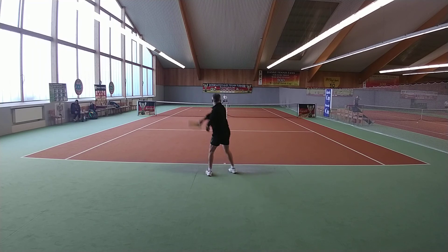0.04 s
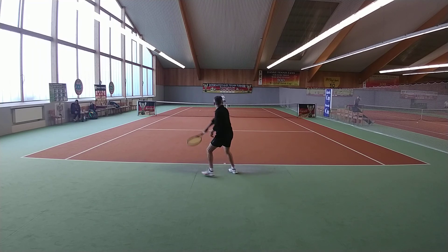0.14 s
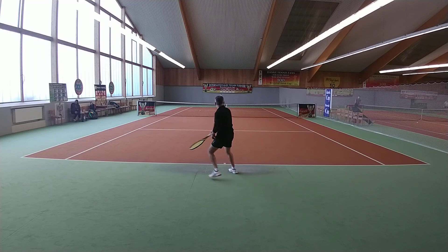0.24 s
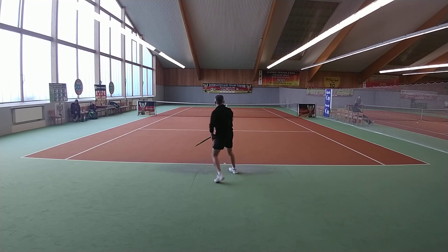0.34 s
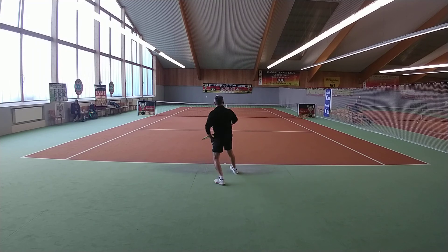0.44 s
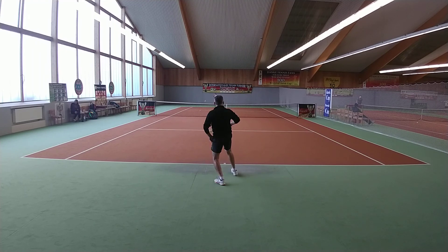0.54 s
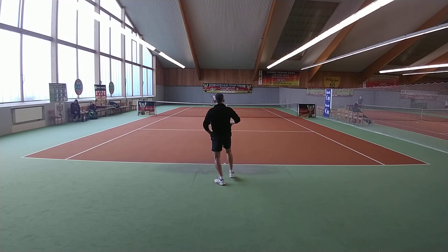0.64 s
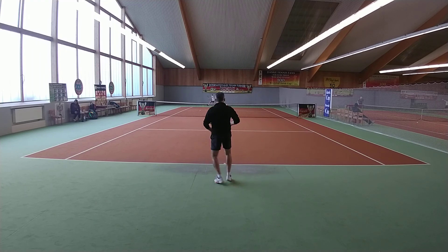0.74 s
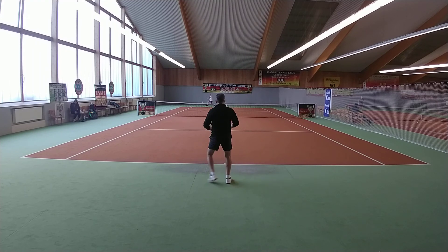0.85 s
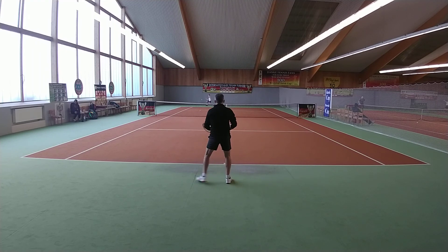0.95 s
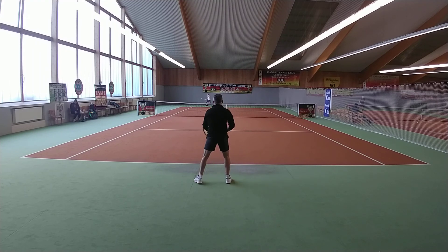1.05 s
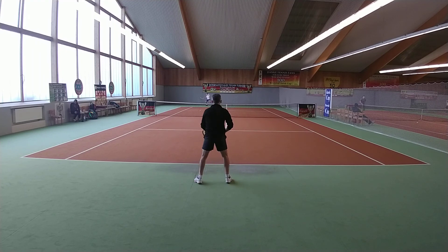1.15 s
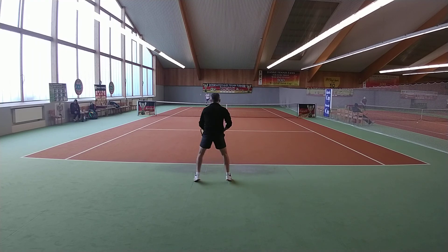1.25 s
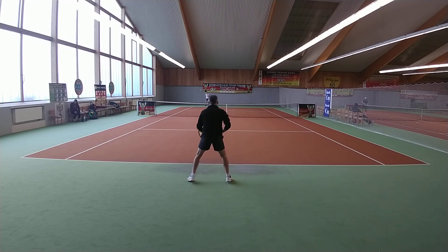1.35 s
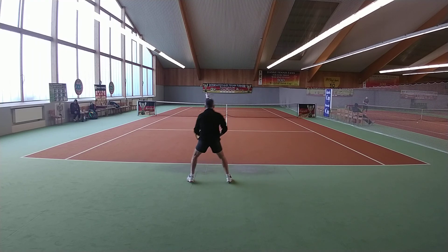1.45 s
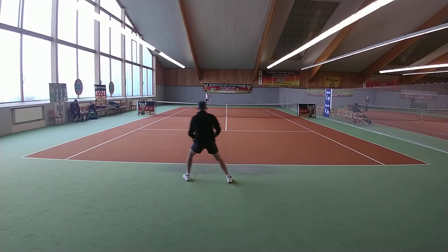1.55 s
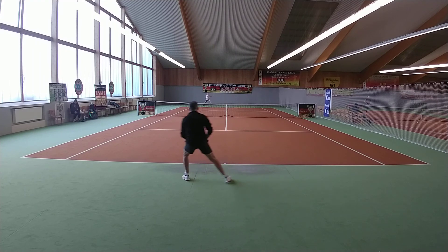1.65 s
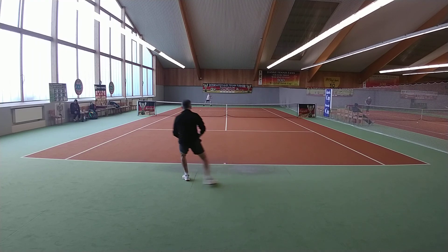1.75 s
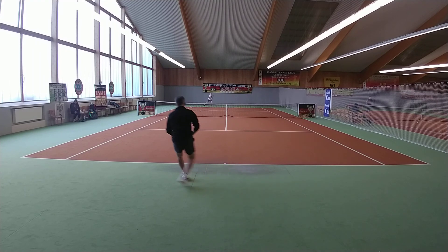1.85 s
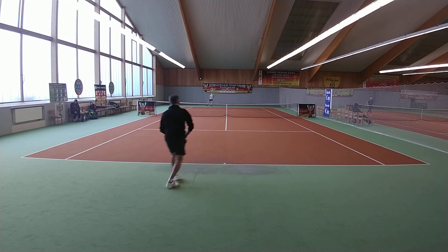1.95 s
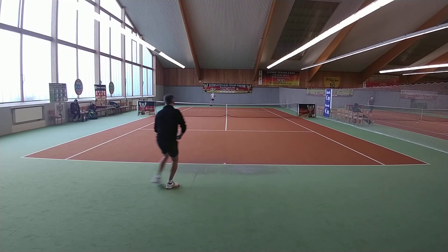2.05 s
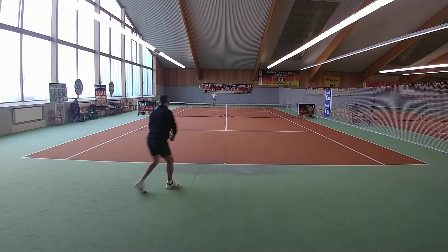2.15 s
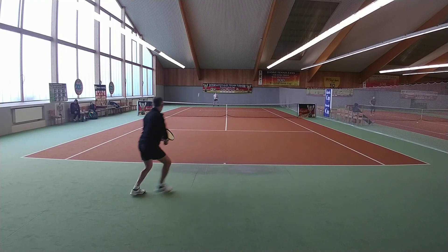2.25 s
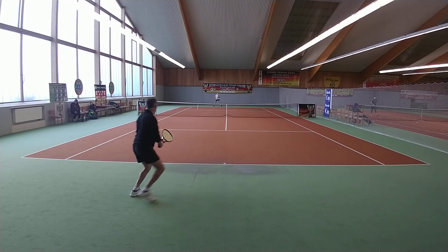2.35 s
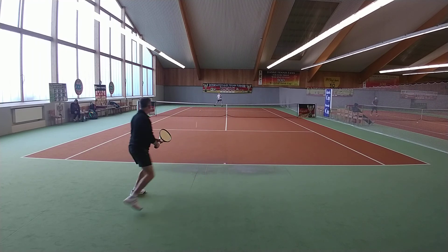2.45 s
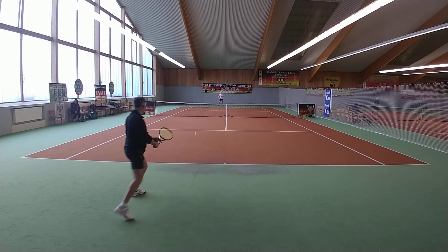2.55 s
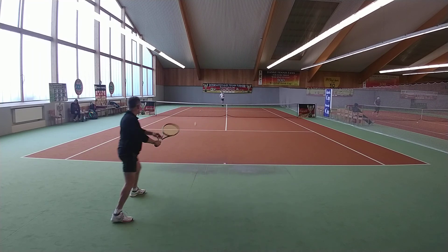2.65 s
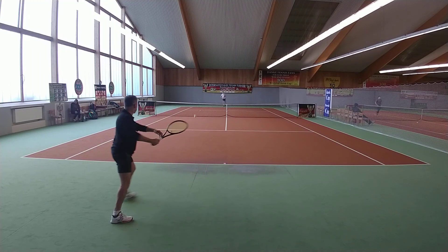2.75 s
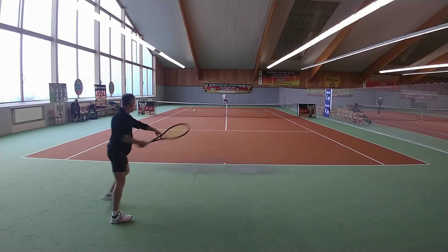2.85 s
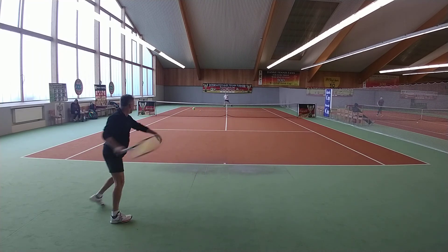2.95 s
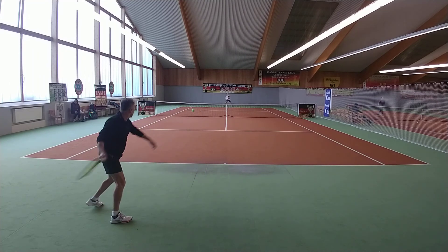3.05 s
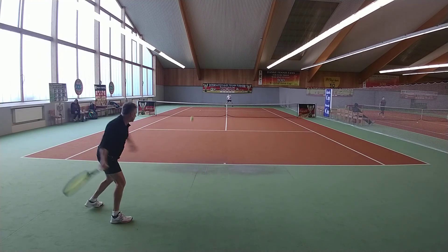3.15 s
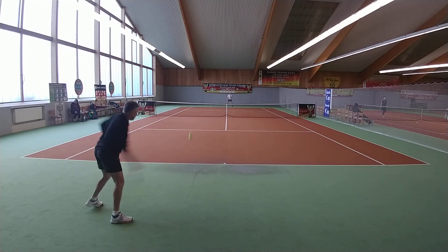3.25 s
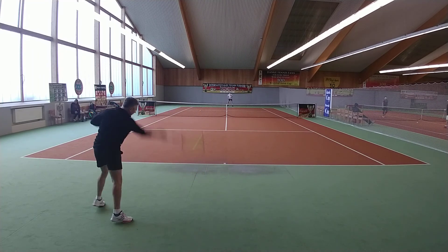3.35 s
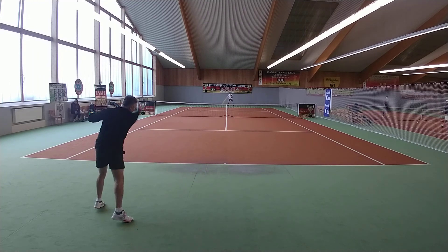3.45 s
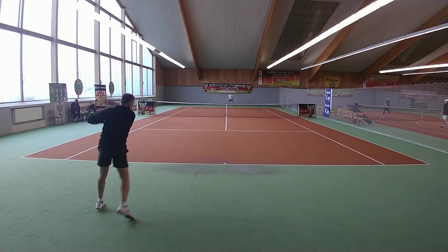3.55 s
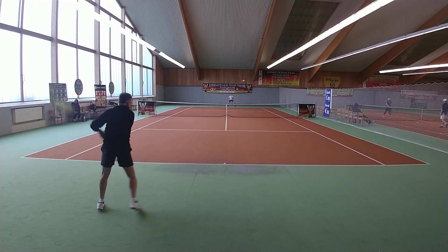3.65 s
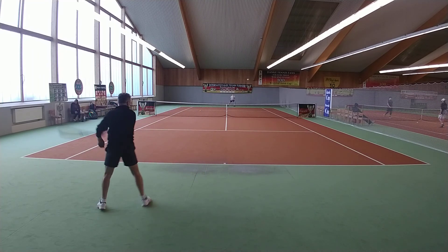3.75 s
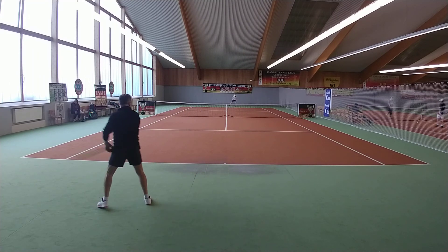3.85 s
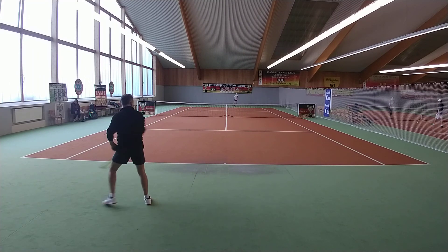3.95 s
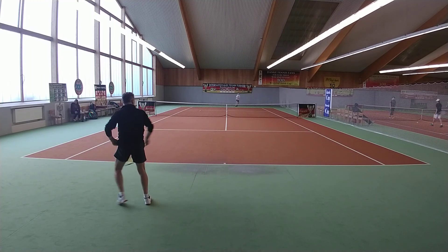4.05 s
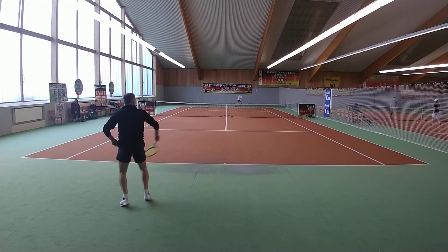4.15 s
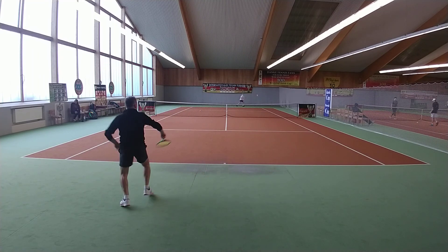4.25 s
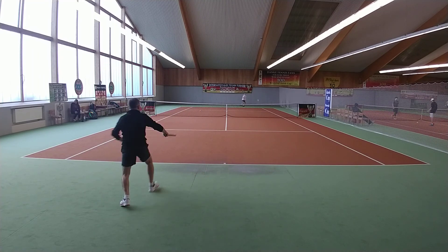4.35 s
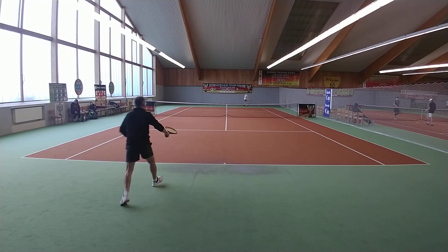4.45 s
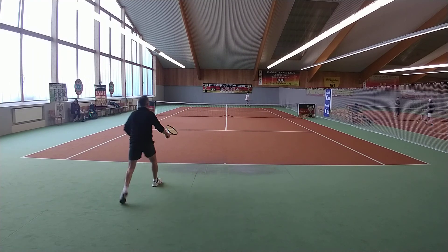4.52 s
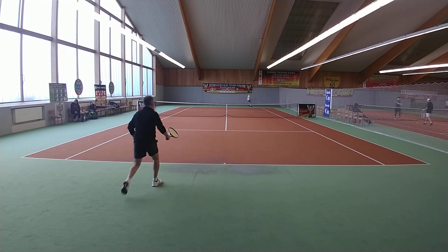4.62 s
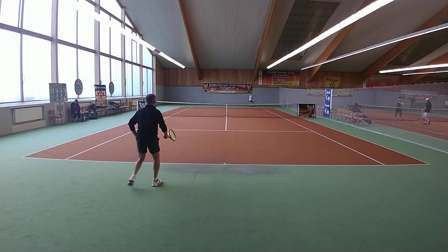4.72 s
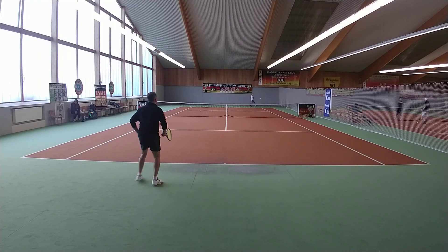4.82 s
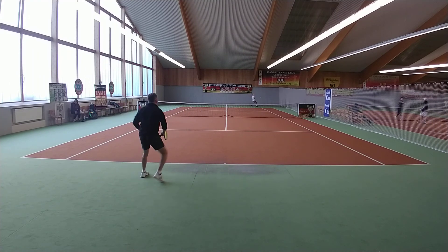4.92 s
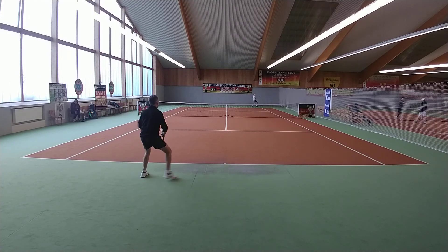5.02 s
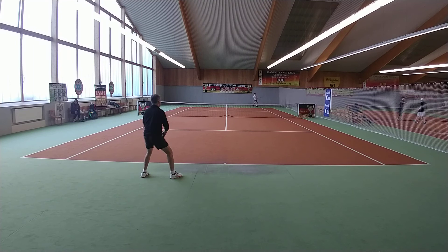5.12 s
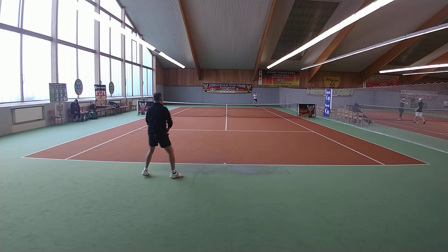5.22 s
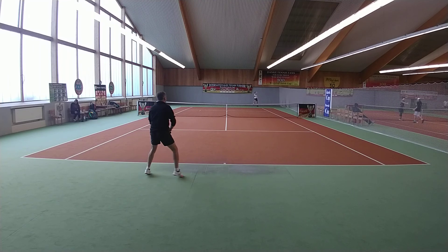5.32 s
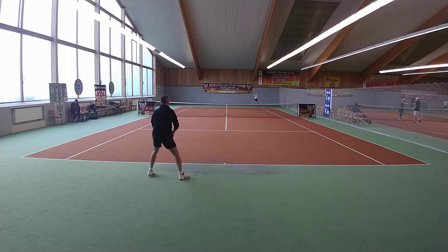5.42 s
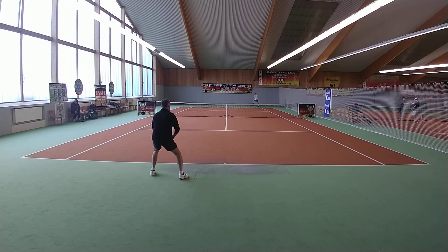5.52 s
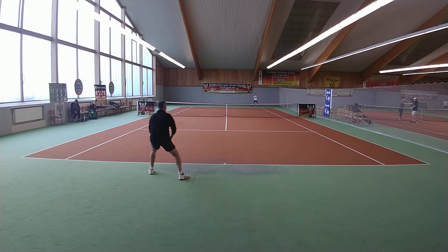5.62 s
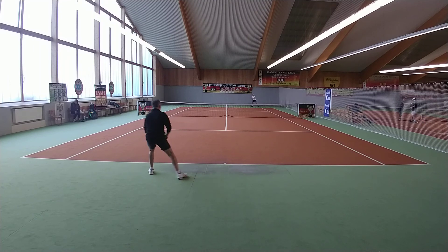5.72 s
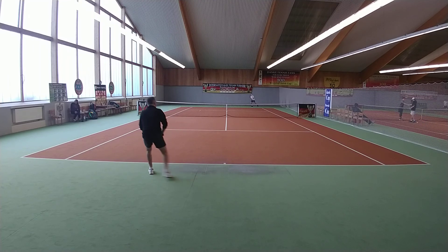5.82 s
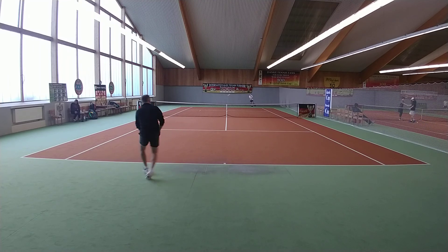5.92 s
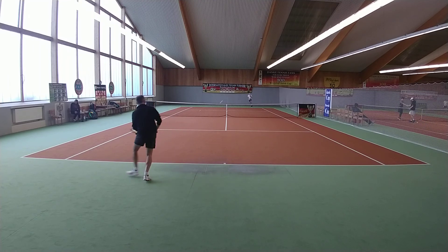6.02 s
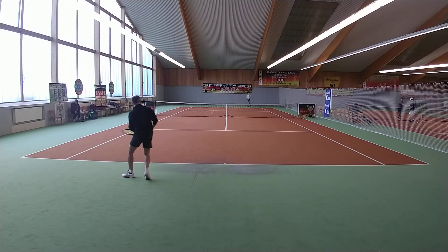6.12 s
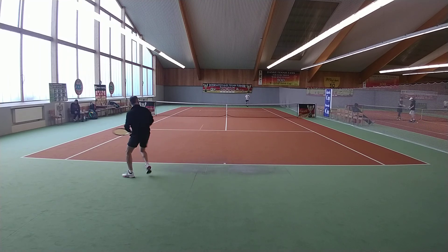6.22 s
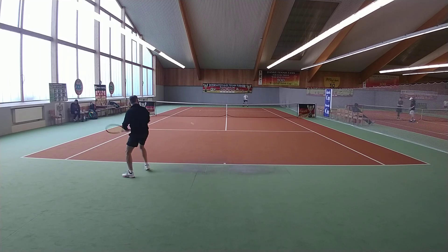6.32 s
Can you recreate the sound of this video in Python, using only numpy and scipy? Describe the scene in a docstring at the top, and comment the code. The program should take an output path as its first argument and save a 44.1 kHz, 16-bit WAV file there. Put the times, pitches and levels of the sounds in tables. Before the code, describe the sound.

Heard from behind the baseline of a reverberant indoor tennis court, shoes thump and swish on carpet over a faint hum. After the fading ring of a stroke come a few soft, distant hits, a hollow ball bounce and one sharp, close racket strike, the loudest sound, which fills the hall. The footwork continues through a faint bounce, a soft far stroke and a final bounce.

```python
"""A rally on a carpeted court in a large indoor hall, heard from behind the near baseline.
The tail of a racket stroke dies into the hum of the hall, and shoes start to thud and brush. Softer
strokes ring near 1.5 s, the ball bounces at 2.6 s, and the loudest stroke cracks at 3.4 s, thrown back
by the end walls. A faint bounce, a soft stroke and a last bounce follow. Throughout, reflections fill
the hall, and a noise gate turns quiet passages down and opens for anything louder."""
import sys
import numpy as np
from scipy import signal
from scipy.fft import rfft, irfft, next_fast_len
from scipy.io import wavfile
from scipy.ndimage import minimum_filter1d

SR = 44100
rng = np.random.default_rng(int(sys.argv[2]) if len(sys.argv) > 2 else 0)


def dump(signal):
    """Clip the signal to [-1, 1] and save it as 16-bit WAV at the path in sys.argv[1]."""
    limited = np.clip(np.atleast_2d(signal).T, -1, 1)
    pcm = np.round(limited * 32767).astype(np.int16)
    wavfile.write(sys.argv[1], SR, pcm)


N = 281358
RUN_IN, HOP = SR // 4, 32   # pre-roll and envelope step, in samples
ENVELOPE_S = (np.arange((N + RUN_IN) // HOP + 1) * HOP - RUN_IN) / SR
EDGES_HZ = 28 * 2 ** (np.arange(29) / 3)   # third-octave bands


def amp(db):
    """dB to gain."""
    return 10 ** (np.asarray(db) / 20)


def at_hz(points, hz):
    """Read a curve on a log-frequency axis."""
    freqs, values = np.transpose(points)
    return np.interp(np.log(hz), np.log(freqs), values)


def bands(colour):
    """Each band's centre and its share of the power in a tone colour; the shares total 1."""
    centres = np.sqrt(EDGES_HZ[1:] * EDGES_HZ[:-1])
    power = amp(at_hz(colour, centres)) ** 2 * np.diff(EDGES_HZ)
    return zip(centres, power / power.sum())


def envelope(times, powers, rises, t60, holds=0):
    """Summed power in time: each event builds up over its rise time, holds, then falls 60 dB in t60."""
    since = np.maximum(ENVELOPE_S - times[:, None], 0)
    attack = np.minimum(since / np.reshape(rises, (-1, 1)), 1) ** 2
    fading = np.maximum(since - np.reshape(holds, (-1, 1)), 0)
    return powers @ (attack * amp(-120 * fading / t60))


def hall_noise(*sources):
    """Diffuse sound: stereo noise bands follow the power that the sources yield, band by band."""
    powers = [sum(band) for band in zip(*sources)]
    white = rng.standard_normal((2, 2, N + RUN_IN))
    out = np.zeros((2, N))
    for k, power in enumerate(powers):
        bandpass = signal.butter(2, EDGES_HZ[k:k + 2], "band", fs=SR, output="sos")
        noise = signal.sosfilt(bandpass, white[k % 2])[:, RUN_IN:]
        out += np.sqrt(np.interp(np.arange(N) / SR, ENVELOPE_S, power)) * noise / noise.std()
    return out


# room tone colour: f/Hz, level/dB
HUM_COLOUR = [(15, -65), (25, -7.5), (113, -7), (178, -15.5), (209, -6.5), (240, -18.5), (274, -11),
              (537, -14), (741, -18), (997, -19.5), (1080, -17.5), (1530, -28.5), (1750, -15.5),
              (2300, -34.5), (15500, -47.5)]
def hum(level_db=-59.5):
    """Air and far courts lay a steady bed under the rally."""
    for _, share in bands(HUM_COLOUR):
        yield share * amp(level_db) ** 2


# decay of the first reflections and of the diffuse tail: f/Hz, t60/s
EARLY_DECAY = [(60, 0.27), (300, 0.55), (1500, 0.49), (6000, 0.36), (15000, 0.16)]
TAIL_DECAY = [(60, 0.33), (300, 2.36), (1000, 3.41), (3000, 1.41), (8000, 0.5), (15000, 0.59)]
def reverb(hz, times, powers, rises, decay_scale, holds=0, tail_db=-16):
    """Power in one band: first reflections die quickly, a quieter tail builds more slowly and lingers."""
    early = envelope(times, powers, rises, at_hz(EARLY_DECAY, hz) * decay_scale, holds)
    tail = envelope(times, powers, rises + 0.0077, at_hz(TAIL_DECAY, hz))
    return early + amp(tail_db) ** 2 * tail


# scuff cues: t/s, level/dB
SCUFFS = [(.40, -57), (1.21, -55), (1.97, -51), (2.20, -54.5), (2.96, -54), (3.2, -59), (4.46, -66.5),
          (4.73, -60), (6.196, -61)]
# hiss of sole on carpet: f/Hz, level/dB
SCUFF_COLOUR = [(800, -25), (2000, 12), (3200, 0), (5000, -8), (8000, -8), (13000, -32), (16000, -20)]
def scuffs():
    """Soles brush the carpet in short, soft swishes."""
    times, level_db = np.transpose(SCUFFS)
    for _, share in bands(SCUFF_COLOUR):
        yield envelope(times, share * amp(level_db) ** 2, rises=0.058, t60=0.26)


# footstep cues: t/s, level/dB, brightness/(dB per octave)
STEPS = [(0.158, -58, -13), (0.399, -43, 5.5), (0.62, -51, -5), (0.729, -48, 0), (0.868, -45.5, 7.5),
         (0.92, -39.5, 5), (1.07, -59, -5), (1.662, -37, -3), (1.973, -31, 6), (2.142, -34.5, 4.5),
         (2.276, -31.5, 4.5), (2.327, -39, 7.5), (2.818, -42, 5), (3.183, -39.5, 1.5), (3.854, -42.5, 0),
         (4.251, -41, 2), (4.439, -43.5, 1), (4.518, -48.5, -2), (4.731, -31.5, 5), (4.787, -39, 3.5),
         (4.877, -52.5, -2.5), (5.026, -36.5, -1.5), (5.079, -49, -4), (5.498, -40, -3), (6.028, -41.5, -6),
         (6.077, -42.5, -5), (6.195, -27, -1)]
# thud of shoe on carpet: f/Hz, level/dB
STEP_COLOUR = [(18, -36), (30, 3.5), (103, 4), (260, -10.5), (345, -16), (860, -31.5), (1060, -32.5),
               (2000, -37), (2600, -57), (4400, -120)]
def footsteps(shuffles=40, shuffle_db=-59.5, spread_db=4, firm_db=-42.5, rise_s=0.023, tail_db=-18.5):
    """Shoes thud on the carpet and stir the hall, with light shuffles at random moments."""
    when, size = rng.random((shuffles, 2)).T
    light_steps = np.column_stack([when * N / SR, shuffle_db + spread_db * (2 * size - 1), 0 * when])
    times, level_db, tilt = np.vstack([STEPS, light_steps]).T
    drag_s = 0.0061 + 0.006 * np.clip(firm_db - level_db, 0, 12)   # softer steps drag on longer
    for hz, share in bands(STEP_COLOUR):
        powers = share * amp(level_db + tilt * np.clip(np.log2(hz / 140), -1, 2)) ** 2
        thud = envelope(times, powers, rise_s, t60=0.14, holds=drag_s)
        tail = envelope(times, powers, rise_s + 0.014, at_hz(TAIL_DECAY, hz))
        yield thud + amp(tail_db) ** 2 * tail


def ring(clicks, modes):
    """Clicks set every mode ringing as a damped sine; the pre-roll is dropped."""
    out = 0
    for hz, level_db, t60 in modes:
        r, w = amp(-60 / (t60 * SR)), 2 * np.pi * hz / SR
        mode = signal.lfilter([0, np.sin(w)], [1, -2 * r * np.cos(w), r * r], clicks + 1e-18)
        out = out + amp(level_db - 10) * mode
    return out[..., RUN_IN:]


def impacts(times, body_db, crack_db, modes, mirrors, split_hz, capsule_lag_s=0.00003):
    """Blows arrive directly and off the nearest surfaces, a little later at the second capsule."""
    body, crack = np.zeros((2, 2, N + 2 * RUN_IN))
    direct = (0.00023, 0.013, 0.016)
    for delay, low_db, high_db in [direct] + mirrors:
        at = np.round((times + delay + [[0], [capsule_lag_s]]) * SR).astype(int) + RUN_IN
        body[[[0], [1]], at] -= amp(body_db + low_db)
        crack[[[0], [1]], at] -= amp(crack_db + high_db)
    low_modes = [m for m in modes if m[0] < split_hz]
    high_modes = [m for m in modes if m[0] >= split_hz]
    return (ring(body, low_modes) + ring(crack, high_modes))[:, :N]


# bounce cues: t/s, direct level/dB, reverb level/dB, reverb brightness/(dB per octave)
BOUNCES = [(2.612, -22, -30.5, 2), (4.675, -47.5, -43.5, 1), (6.347, -31, -32.5, 0)]
# ball resonances: f/Hz, level/dB, t60/s
BALL_MODES = [(146, 13, 0.027), (263, -25, 0.017), (1075, 2.5, 0.02), (1407, -1, 0.03), (3200, -73, 0.0055)]
# slaps off the nearest surfaces: delay/s, body level/dB, crack level/dB
BOUNCE_MIRRORS = [(.014, 4, -6.5), (0.027, 1, -7.5), (.045, -3, -21), (.06, 2, -41)]
def ball_bounces():
    """The ball hits the carpet and rings briefly: a low thump with a hollow pock on top."""
    times, level_db, _, _ = np.transpose(BOUNCES)
    return impacts(times, level_db, level_db, BALL_MODES, BOUNCE_MIRRORS, split_hz=600)


# colour of a bounce's reverb: f/Hz, level/dB
BOUNCE_COLOUR = [(24, -24), (40, 2), (117, -1), (229, -3.5), (301, -6), (484, -18.5), (1020, -24),
                 (1560, -29.5), (2330, -38), (3650, -82), (15500, -82)]
def bounce_reverb():
    """The hall answers each bounce with a dark boom."""
    times, _, level_db, tilt = np.transpose(BOUNCES)
    for hz, share in bands(BOUNCE_COLOUR):
        powers = share * amp(level_db + tilt * np.clip(np.log2(hz / 140), -1, 3)) ** 2
        yield reverb(hz, times, powers, rises=0.01, decay_scale=0.61)


# stroke cues: t/s, body level/dB, crack level/dB; then for the reverb: level/dB, rise/s,
# end-wall round trip/s, early decay/ratio, treble/dB, end-wall echo/dB, ring/Hz, bass/dB
STROKES = [(-0.14, -20, -20, -30, 0.0013, 0.214, 1, 5, -14, 2600, 2),
           (1.346, -35.5, -40, -27.5, 0.035, 0.28, 0.91, -1, -21, 920, 0.5),
           (1.566, -66, -37.5, -34.5, 0.0056, 0.218, 0.81, -6, -10.5, 3130, -1.5),
           (1.612, -63, -39, -35, 0.0057, .2156, 0.75, -4.5, -17.5, 3240, 1.5),
           (1.655, -33.5, -58, -33.5, 0.012, 0.22, 1, -10, -11, 477, 1.5),
           (3.418, -15, -13, -27.5, 0.0073, 0.21, 0.67, 1, -12, 430, 0),
           (5.332, -34.5, -35, -29, 0.027, 0.26, .95, -1, -29, 3430, 2)]
def end_wall_echoes(second_trip_db=-13, echo_decay_scale=0.34):
    """Each stroke, then its two trips to the end wall and back: times, levels, rises, decay scales."""
    times, _, _, level_db, rise, trip, decay_scale, _, echo_db, _, _ = np.transpose(STROKES)
    return (np.concatenate([times, times + trip, times + 2 * trip]),
            np.concatenate([level_db, level_db + echo_db, level_db + echo_db + second_trip_db]),
            np.concatenate([rise, rise + 0.0052, rise + 0.069]),
            np.concatenate([decay_scale, np.full(2 * len(times), echo_decay_scale)]))


# colour of a stroke's reverb: f/Hz, level/dB
STROKE_COLOUR = [(24, -76), (40, -23.5), (317, -7), (686, -10.5), (778, -9.5), (1050, -11.5), (1820, -26),
                 (2330, -5), (2640, -34.5), (3650, -26.5), (4920, -28), (8110, -31.5), (12100, -58),
                 (13300, -28), (15500, -66)]
def stroke_reverb(treble_db_per_trip=-7.5, echo_hold_s=0.077, ring_db=4, ring_octaves=0.59):
    """Strokes fill the hall; their end-wall echoes come back smeared and duller with every trip."""
    times, level_db, rises, decay_scale = end_wall_echoes()
    treble_db, _, ring_hz, bass_db = np.tile(np.transpose(STROKES)[7:], 3)
    trips = np.repeat(np.arange(3), len(STROKES))
    for hz, share in bands(STROKE_COLOUR):
        low_shelf = bass_db * np.clip(np.log2(600 / hz), 0, 1.5)
        high_shelf = (treble_db + treble_db_per_trip * trips) * np.clip(np.log2(hz / 1500), 0, 1)
        bell = ring_db * np.exp(-(np.log2(hz / ring_hz) / ring_octaves) ** 2)
        powers = share * amp(level_db + low_shelf + high_shelf + bell) ** 2
        yield reverb(hz, times, powers, rises, decay_scale[:, None], echo_hold_s * (trips > 0))


def scattered_clicks(echoes_per_s=340, send_db=-18):
    """Beams and walls return separate copies of each stroke, uneven in size: one click for each."""
    times, level_db, rises, _ = end_wall_echoes()
    power = envelope(times, amp(level_db + send_db) ** 2, rises, t60=0.36)
    shape = (2, N + RUN_IN)
    clicks = (rng.random(shape) < echoes_per_s / SR) * rng.standard_normal(shape)
    return clicks * np.sqrt(np.repeat(power, HOP)[:N + RUN_IN])


# resonances of strings and frame: f/Hz, level/dB, t60/s
RACKET_MODES = [(223, -20, 0.15), (340, 2.5, 0.018), (475, -0.5, 0.024), (720, 5, 0.011), (1084, -1, 0.014),
                (1470, -1, 0.0078), (1970, -16.5, 0.0033), (2380, -10, 0.015), (4080, -8.5, 0.0057),
                (5860, -5, 0.004), (7330, 0.5, 0.0024), (13100, -12.5, 0.0098)]
# slaps off floor and player, then walls and roof: delay/s, body level/dB, crack level/dB
STROKE_MIRRORS = [(.0021, 10.5, 6.5), (.0042, 6.5, 1), (.0074, 7, -11), (0.018, -9, -1), (0.026, -2, 0),
                  (.036, 1.5, -9)]
def racket_strokes():
    """The ball sets strings and frame ringing; little of the blow reaches below 160 Hz."""
    times, body_db, crack_db = np.transpose(STROKES)[:3]
    hits = impacts(times, body_db, crack_db, RACKET_MODES, STROKE_MIRRORS, split_hz=2200)
    scatter = ring(scattered_clicks(), RACKET_MODES)
    return signal.sosfilt(signal.butter(2, 160, "high", fs=SR, output="sos"), hits + scatter)


def scene():
    """Sound at the two capsules: rackets and ball in front, footwork and the hall around them."""
    blows = racket_strokes() + ball_bounces()
    hall = hall_noise(hum(), scuffs(), footsteps(), bounce_reverb(), stroke_reverb())
    return blows + amp(5) * hall


def fall_slowly(db, db_per_s):
    """Follow a level up at once and down no faster than a steady rate."""
    slope = db_per_s * np.arange(N) / SR
    return np.maximum.accumulate(db + slope) - slope


def noise_gate(x, shut_db=-6, open_db=2, knee_db=9, window_s=0.004, ahead_s=0.011, hold_s=0.02):
    """Gain follows the level: down below the threshold, up above it, held a moment, then released."""
    ahead, hold = int(ahead_s * SR), int(hold_s * SR) // 2 * 2 + 1
    pole = np.exp(-1 / (window_s * SR))
    start_power = np.mean(x[:, :400] ** 2)
    power, _ = signal.lfilter([1 - pole], [1, -pole], np.mean(x ** 2, axis=0), zi=[start_power])
    level_db = 10 * np.log10(np.pad(power[ahead:], (0, ahead), "edge") + 1e-12)
    peak_db = fall_slowly(level_db, db_per_s=31)
    threshold_db = np.maximum(-42.5, peak_db - 8)   # stands higher after a loud peak
    gain_db = shut_db + (open_db - shut_db) / (1 + np.exp((threshold_db - level_db) / knee_db))
    held_db = -minimum_filter1d(-gain_db, hold, origin=hold // 2, mode="nearest")
    return x * amp(fall_slowly(held_db, db_per_s=250))


# phase between the mixed capsules: f/Hz, phase/rad
CAPSULE_PHASE = [(0, 1.84), (130, 1.73), (300, 0.98), (700, 0.77), (1180, 0.17)]
# bleed of the other capsule into each channel: f/Hz, level/dB
BLEED = [(100, -4.5), (1200, -2.5), (3000, -3.5), (6000, -17.5), (14000, -9)]
# balance, left over right: f/Hz, level/dB
BALANCE = [(60, 6.5), (110, 4.5), (200, 2.5), (380, 2), (700, 2.5), (1290, 2), (2380, 1), (4400, 3),
           (8120, 9.5), (15000, -2)]
def record(dry, first_capsule_db=-2.5, hz_per_turn=2340, low_cut_hz=59, high_cut_hz=16000):
    """Each channel mixes both capsules, turned in phase against each other; then low cut, gate, top cut."""
    size = next_fast_len(N + 4096)
    hz = np.arange(size // 2 + 1) * SR / size
    treble_turns = np.maximum(hz - CAPSULE_PHASE[-1][0], 0) / hz_per_turn
    phase = np.interp(hz, *np.transpose(CAPSULE_PHASE)) + 2 * np.pi * treble_turns
    turn = np.exp(0.5j * phase)
    bleed = amp(at_hz(BLEED, hz + 1))
    pan = amp(at_hz(BALANCE, hz + 1) / 2)
    first, second = rfft(dry, size) * amp([[first_capsule_db], [0]]) / np.sqrt(2)
    left = (first * turn + bleed * second / turn) * pan
    right = (bleed * first / turn + second * turn) / pan
    out = irfft([left, right], size)[:, :N]
    out = signal.sosfilt(signal.butter(4, low_cut_hz, "high", fs=SR, output="sos"), out)
    out = noise_gate(out)
    return signal.sosfilt(signal.cheby2(14, 60, high_cut_hz, fs=SR, output="sos"), out)


dry = scene()
out = record(dry)
dump(out)
```